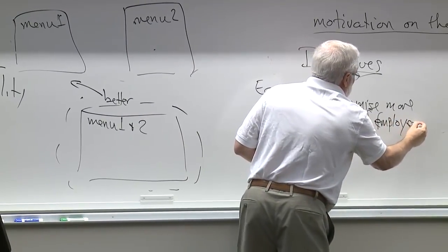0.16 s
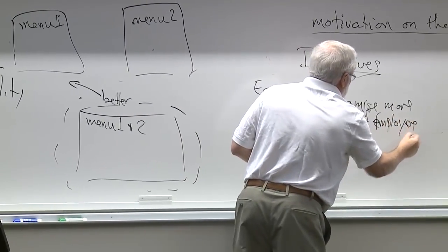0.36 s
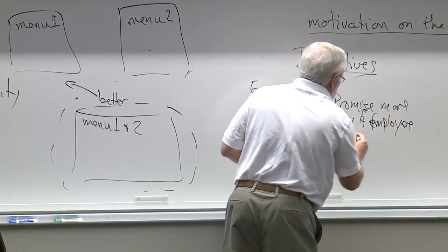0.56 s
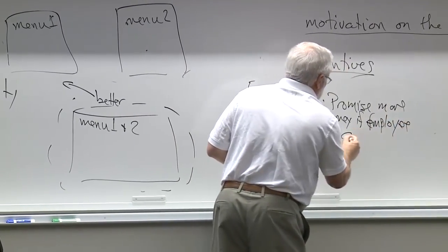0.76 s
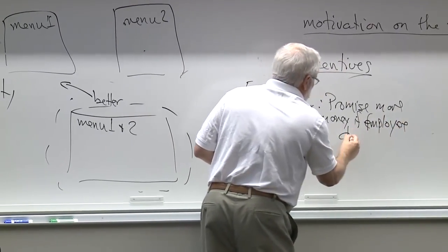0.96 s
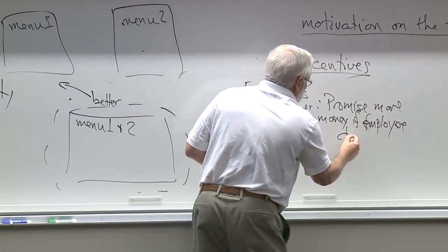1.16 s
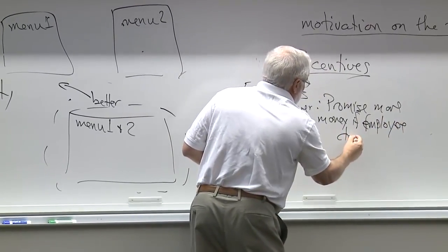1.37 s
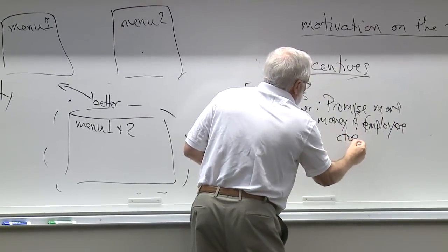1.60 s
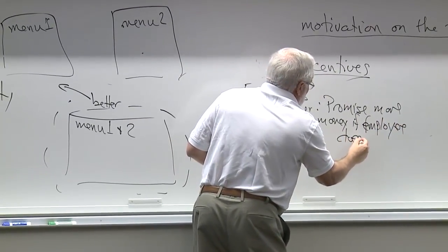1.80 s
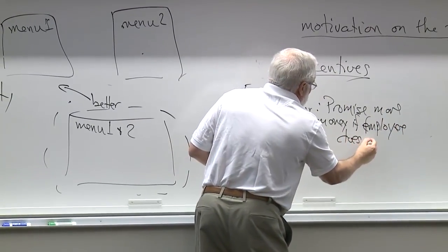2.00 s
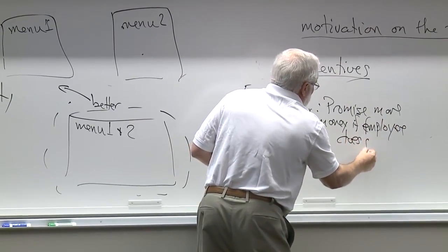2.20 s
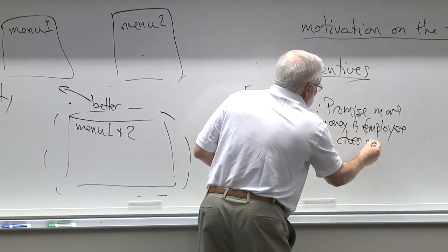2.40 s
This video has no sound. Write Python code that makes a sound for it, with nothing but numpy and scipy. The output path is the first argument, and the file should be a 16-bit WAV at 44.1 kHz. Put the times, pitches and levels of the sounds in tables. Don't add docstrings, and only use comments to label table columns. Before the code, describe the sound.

A felt marker writes on a whiteboard with short hissing strokes and soft hollow thumps

```python
import sys
import numpy as np
from scipy import signal
from scipy.fft import rfft, irfft
from scipy.io import wavfile
from scipy.ndimage import uniform_filter1d

SR = 44100
rng = np.random.default_rng(int(sys.argv[2]) if len(sys.argv) > 2 else 0)


def unload_wav(signal):
    wavfile.write(
        sys.argv[1],
        SR,
        np.round(np.clip(np.atleast_2d(signal).T, -1, 1) * 32767).astype(np.int16),
    )


def voltage_ratio(level):
    return 10 ** (np.asarray(level, float) / 20)


N = 108045

# pitch in Hz, level in dB, t60 in s.
PANEL_MODES = [(187, -3, .12), (250, 1, .12), (295, -6, .11), (335, -1, .11), (391, 0, .12), (465, -8, .1),
               (518, -6, .12), (559, -2, .12), (666, -5, .1), (758, -12, .1), (880, -18, .09),
               (1100, -22, .09), (1400, -25, .07), (1750, -28, .06)]
# frequency in Hz, density in dB per Hz.
HISS_SPECTRUM = [(300, -8), (900, 6), (2000, -3.5), (3500, -7), (6000, 0.5), (12000, 2.6), (14500, -4),
                 (15700, -6)]


def evened(x):
    return x / np.sqrt(np.mean(x ** 2) + 1e-20)


def coloured(points):
    point_hz, point_db = np.transpose(points)
    hz = np.fft.rfftfreq(N, 1 / SR)
    gain = voltage_ratio(np.interp(np.log(hz + 1), np.log(point_hz), point_db))
    return evened(irfft(rfft(rng.standard_normal(N)) * gain, N))


def resonate(x, hz, width):
    turn = np.exp(2j * np.pi * np.cumsum(hz * np.ones(len(x))) / SR)
    r = np.exp(-np.pi * width / SR)
    return 2 * (turn * signal.lfilter([1 - r], [1, -r], x / turn)).real


def speed(start, rise, fall):
    corners = [start, start + rise, start + rise + fall]
    return np.sin(np.pi / 2 * np.interp(np.arange(N) / SR, corners, [0, 1, 0]))


def panel(spot_db):
    push_db, push_hz, push_ms = 5.0, 390, 1.5
    t = np.arange(SR // 4) / SR
    ring = np.zeros(len(t))
    for k, ((hz, db, t60), spot) in enumerate(zip(PANEL_MODES, spot_db)):
        sign = (-1) ** k
        ring += sign * voltage_ratio(db + spot - 60 * t / t60) * np.sin(2 * np.pi * hz * t)
    ring /= 2 * ring[:SR // 40].std()
    u = t - 2 * push_ms / 1000
    push = voltage_ratio(push_db - 9.3 * (u * 1000 / push_ms) ** 2) * np.cos(2 * np.pi * push_hz * u)
    return ring - push


def air():
    # frequency in Hz, density in dB per Hz.
    air_spectrum = [(25, -41), (60, -9.5), (250, 3), (600, -10), (1500, -16), (5000, -26), (11500, -28.5),
                    (13000, -38)]
    return voltage_ratio(-69.5) * coloured(air_spectrum)


def swishes():
    # start in s, rise in s, fall in s, level in dB.
    sweeps = [(-.1, 0.23, .16, -65), (0.398, 0.12, 0.13, -69), (0.716, 0.012, 0.039, -70.5),
              (.765, .05, .08, -91), (0.972, 0.064, .1, -57), (1.128, 0.053, 0.39, -85),
              (1.59, 0.053, 0.073, -61.5), (1.741, 0.096, 0.15, -68), (2.132, 0.063, 0.15, -65.5),
              (.24, 0.12, .13, -66.5), (1.36, 0.087, 0.23, -68.5), (1.25, .04, .05, -69),
              (1.9, .04, .05, -74), (0.746, 0.018, 0.031, -57.5)]
    level = sum(voltage_ratio(db) * speed(start, rise, fall) ** 2.47 for start, rise, fall, db in sweeps)
    return coloured(HISS_SPECTRUM) * level


def strokes():
    # start in s, rise in s, fall in s, level in dB, main nib resonance in Hz.
    pen_strokes = [(-.04, .05, .07, -60, 7200), (.214, .018, .095, -54, 7500), (.33, .045, .052, -57, 7700),
                   (.755, .055, .08, -51, 5900), (1.0, .025, .085, -58, 6000),
                   (1.219, .013, .058, -60, 6600), (1.29, .04, .06, -63, 6600),
                   (1.39, .03, .022, -67, 6800), (1.46, .07, .055, -58, 7000),
                   (1.575, .07, .055, -57, 6900), (1.79, .045, .055, -61, 7100),
                   (1.88, .03, .03, -70, 7000), (1.943, .022, .03, -67, 6800),
                   (2.137, .011, .017, -62, 7200), (2.17, .04, .042, -65, 7200),
                   (2.255, .077, .055, -58, 6800), (2.432, .018, .02, -80, 9000)]
    # multiple of the main resonance, width in Hz, level in dB.
    nib_modes = [(0.712, 835, -17), (1.001, 1190, -4.93), (1.368, 1320, -12), (1.7, 2140, -14.5)]
    grit_db, grit_ms = 1.5, 4.0
    squeak_hz, squeak_db = 60, -8.0
    wide_db, rumble_db = -4, -10.5
    roughness = uniform_filter1d(rng.standard_normal(N), int(grit_ms * SR / 1000))
    grit = voltage_ratio(grit_db * evened(roughness))
    rub, wide = rng.standard_normal(N), coloured(HISS_SPECTRUM)
    out, drive = np.zeros(N), np.zeros(N)
    for start, rise, fall, db, main_hz in pen_strokes:
        a, b = max(int(start * SR), 0), int((start + rise + fall) * SR)
        nib = 0
        for multiple, width, mode_db in nib_modes:
            hz = multiple * main_hz
            voice = evened(resonate(resonate(rub[a:b], hz, width), hz, width))
            if multiple >= 1:
                voice += voltage_ratio(squeak_db) * evened(resonate(rub[a:b], hz, squeak_hz))
            nib = nib + voltage_ratio(mode_db) * voice
        level = (voltage_ratio(db) * speed(start, rise, fall) ** 1.5 * grit)[a:b]
        out[a:b] += level * (nib + voltage_ratio(wide_db) * wide[a:b])
        drive[a:b] += level
    body = panel(np.zeros(len(PANEL_MODES)))
    rumble = signal.oaconvolve(drive * rng.standard_normal(N), body / np.linalg.norm(body))[:N]
    return out + voltage_ratio(rumble_db) * rumble


def ticks():
    # time in s, level in dB, pitch in Hz, length in s.
    finger_ticks = [(.099, -58.5, 1600, 0.025), (.222, -45.5, 1670, 0.016), (.378, -61, 1500, 0.03),
                    (.449, -62.5, 2140, 0.026), (.493, -59.5, 1850, 0.019), (.72, -53, 1204, 0.019),
                    (.961, -65.5, 1810, 0.031), (1.015, -54, 1690, 0.05), (1.225, -51.5, 1880, 0.032),
                    (1.313, -55.5, 1700, 0.019), (1.625, -63.5, 1430, .05), (1.793, -59, 1580, 0.043),
                    (1.897, -59, 1390, 0.01), (2.057, -69, 1940, 0.018), (2.158, -47.5, 1940, 0.019),
                    (2.19, -81, 2200, 0.014), (2.383, -61, 1910, 0.02), (2.437, -66.5, 1820, .03),
                    (2.133, -54.5, 1160, 0.045), (0.2, -56.5, 1120, 0.04)]
    rise_s, relative_width = .004, .5
    partials = [(1, 0), (1.4, -4.0)]
    out, noise = np.zeros(N), rng.standard_normal((len(finger_ticks), 4000))
    t = np.arange(4000) / SR
    for (start, db, hz, length), rattle in zip(finger_ticks, noise):
        width = relative_width * hz
        body = 0
        for multiple, partial_db in partials:
            once = resonate(rattle, multiple * hz, width)
            body = body + voltage_ratio(partial_db) * evened(resonate(once, multiple * hz, width))
        envelope = voltage_ratio(db - 15 * t / length) * np.minimum(t / rise_s, 1)
        part = out[round(start * SR):][:4000]
        part += (envelope * body)[:len(part)]
    return out


def thumps():
    # time in s, strength in dB, softness of contact in ms, rebound in dB.
    landings = [(.200, -35, 1.0, 3), (.713, -34, 1.0, 5), (.998, -38, 1.0, 4), (1.218, -37, 0.92, 4),
                (1.788, -45, 1.0, 2), (2.132, -34, 0.86, 4)]
    tip_db, tip_sharp = -4, 0.25
    rebound_s, rebound_soft = .0162, 1.7
    spot_spread_db = 3.0
    low_cut_hz, bass_leak_db = 165, -17.0
    out, spots = np.zeros(N), rng.standard_normal((len(landings), len(PANEL_MODES)))
    t = np.arange(N) / SR
    for (start, db, ms, rebound_db), spot in zip(landings, spots):
        felt = (start, 1, ms)
        core = (start, voltage_ratio(tip_db), ms * tip_sharp)
        rebound = (start + rebound_s, voltage_ratio(rebound_db), ms * rebound_soft)
        blow = np.zeros(N)
        for at, gain, width in [felt, core, rebound]:
            blow += gain / width * np.exp(-((t - at) * 2000 / width) ** 2)
        out += voltage_ratio(db) * signal.oaconvolve(blow * 2000 / SR, panel(spot_spread_db * spot))[:N]
    low_cut = signal.butter(5, low_cut_hz, "high", fs=SR, output="sos")
    return signal.sosfilt(low_cut, out) + voltage_ratio(bass_leak_db) * out


def room(x):
    level_db, t60, build_up_s = -9.5, .33, .015
    t = np.arange(SR // 2) / SR
    tail = rng.standard_normal(len(t)) * voltage_ratio(-60 * t / t60) * np.clip(t / build_up_s, 0, 1) ** 2
    return voltage_ratio(level_db) * signal.oaconvolve(x, tail / np.linalg.norm(tail))[:N]


def board_sing():
    # start in s, rise in s, fall in s, level in dB.
    sings = [(0.988, 0.038, 0.11, -69), (1.192, 0.038, 0.31, -72), (1.448, 0.221, 0.036, -69),
             (1.762, 0.063, 0.15, -72.5)]
    # resonance in Hz, width in Hz, level in dB.
    singing_modes = [
        (2420, 60, 0.0),
        (760, 50, -5.0),
        (2790, 40, -8.0),
    ]
    noise = rng.standard_normal(N)
    tone = sum(voltage_ratio(db) * evened(resonate(noise, hz, width)) for hz, width, db in singing_modes)
    return tone * sum(voltage_ratio(db) * speed(start, rise, fall) for start, rise, fall, db in sings)


def whistles():
    # start in s, rise in s, fall in s, top pitch in Hz, level in dB.
    skims = [(1.175, .075, .05, 14250, -74), (1.39, .05, .04, 14650, -82), (1.48, .04, .04, 14650, -78),
             (1.54, .03, .03, 13700, -79), (1.595, .04, .045, 14500, -72), (1.79, .04, .04, 15400, -75)]
    sag, width_hz = .2, 90
    lines = [(1, 0), (.81, -5.0)]
    noise, out = rng.standard_normal(N), np.zeros(N)
    for start, rise, fall, top_hz, db in skims:
        a, b = int(start * SR), int((start + rise + fall) * SR)
        hand = speed(start, rise, fall)[a:b]
        pitch = top_hz * (1 - sag * (1 - hand))
        for multiple, line_db in lines:
            line = evened(resonate(noise[a:b], multiple * pitch, width_hz))
            out[a:b] += voltage_ratio(db + line_db) * hand * line
    return out


def scene():
    knock = thumps() + ticks()
    friction = strokes() + swishes() + whistles() + board_sing()
    return (knock + room(knock) + friction + air())[None]


def band_limit(x):
    return signal.sosfilt(signal.butter(12, 15720, fs=SR, output="sos"), x)


def record(dry):
    gate_db, slope, depth_db = -65.5, 1, 14
    close_db_per_s, edge_hz = 99, 15780
    level_db = 10 * np.log10(abs(uniform_filter1d(dry[0] ** 2, size=600)) + 1e-12)
    fall = np.arange(N) * close_db_per_s / SR
    held_db = np.maximum.accumulate(np.minimum(level_db, gate_db) + fall) - fall
    gated = dry * voltage_ratio(-np.clip(slope * (gate_db - held_db), 0, depth_db))
    band = signal.firwin(511, edge_hz, window=("kaiser", 9), fs=SR)
    mix = signal.oaconvolve(gated, band[None], "same")
    return band_limit(mix)


dry = scene()
out = record(dry)
unload_wav(out)
```